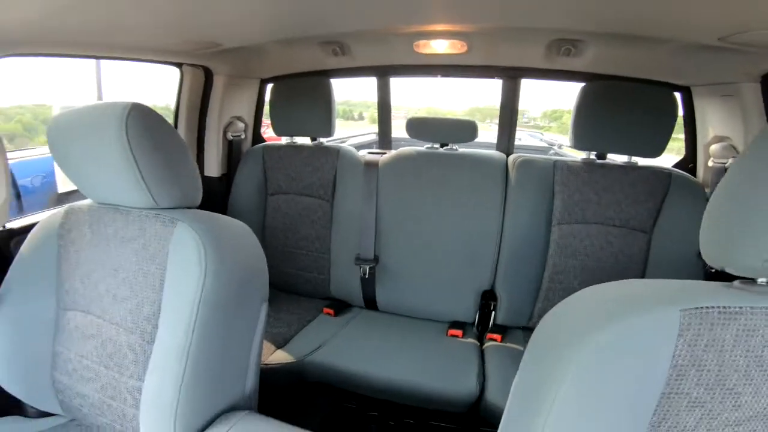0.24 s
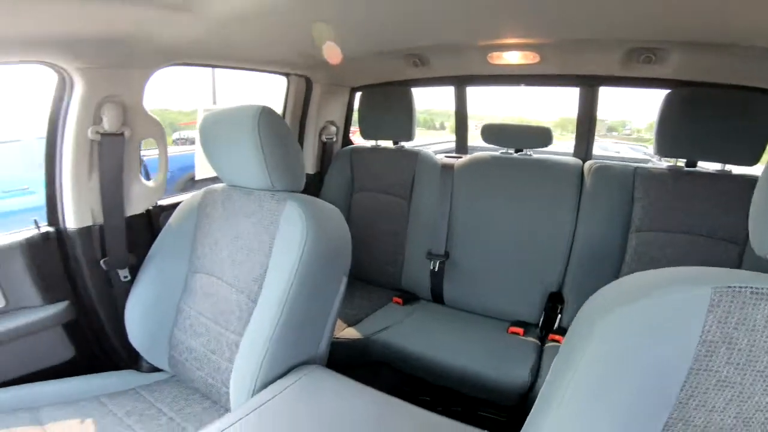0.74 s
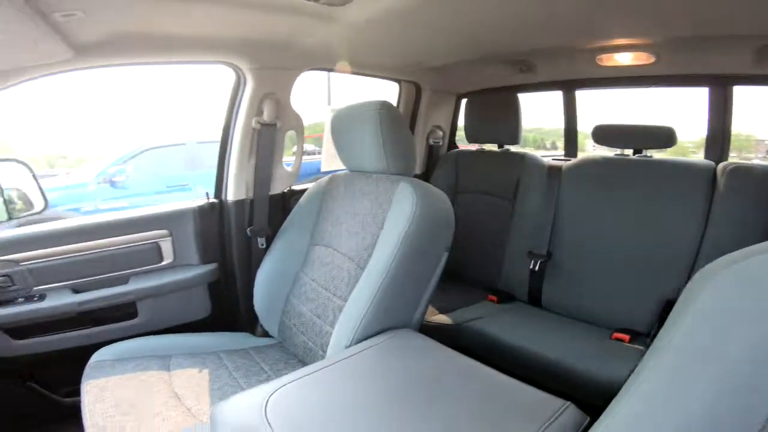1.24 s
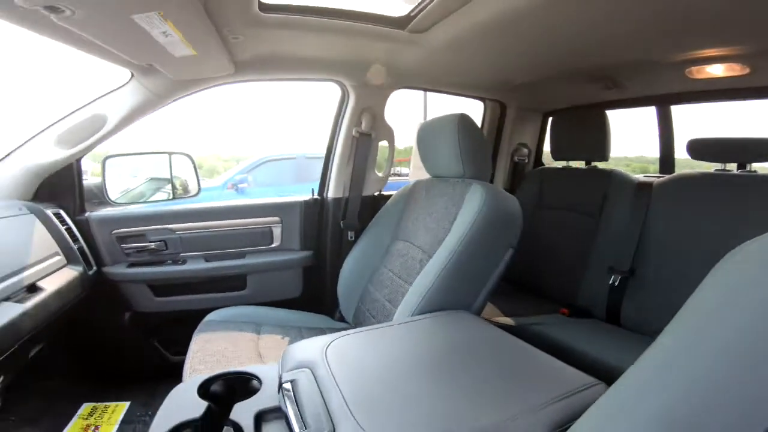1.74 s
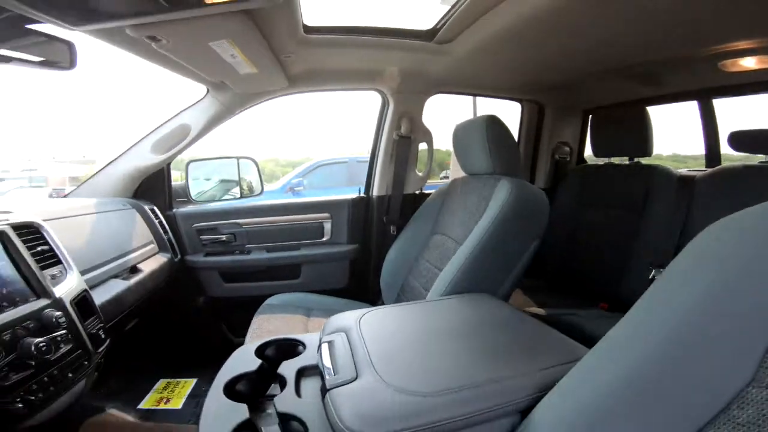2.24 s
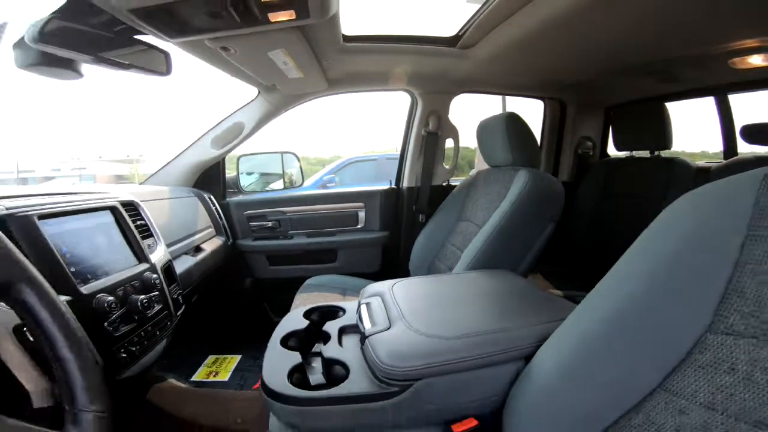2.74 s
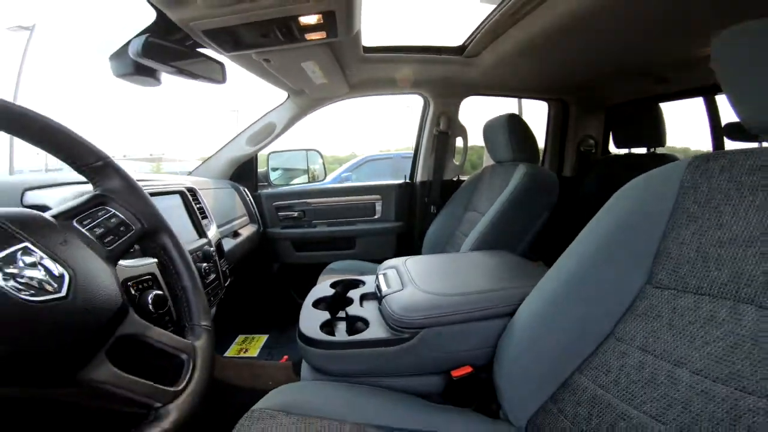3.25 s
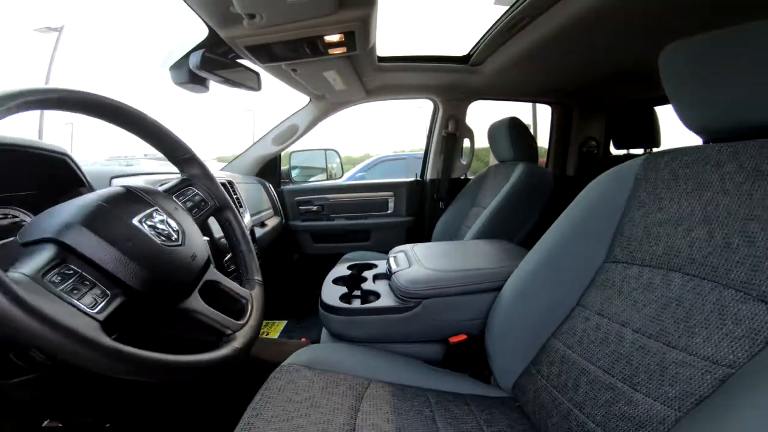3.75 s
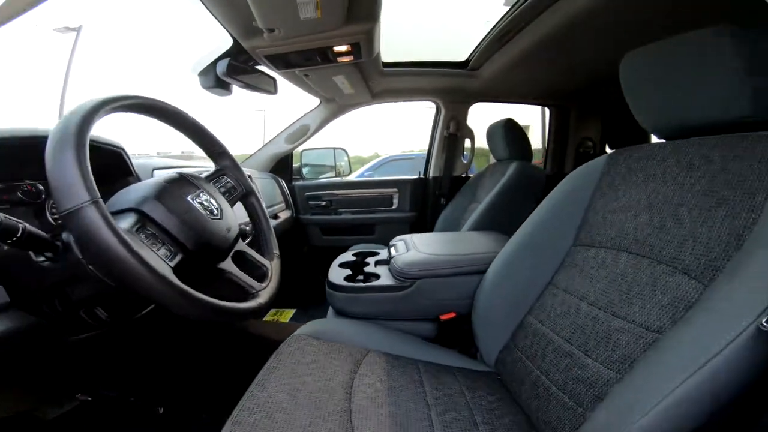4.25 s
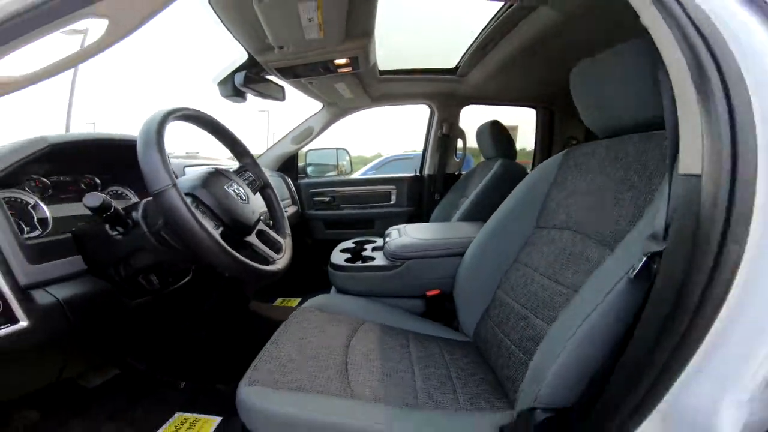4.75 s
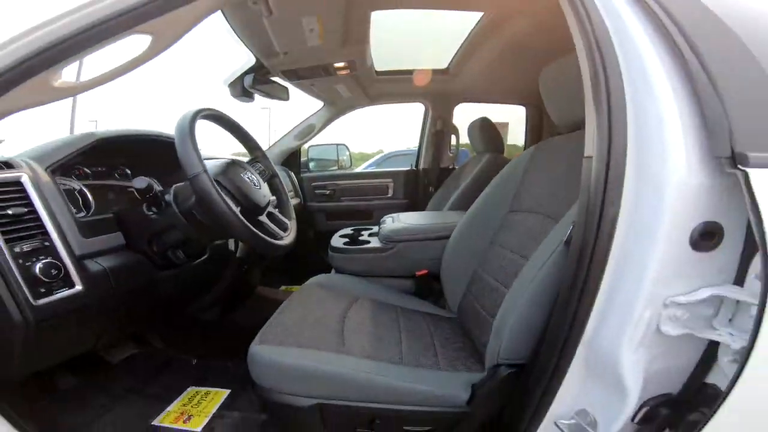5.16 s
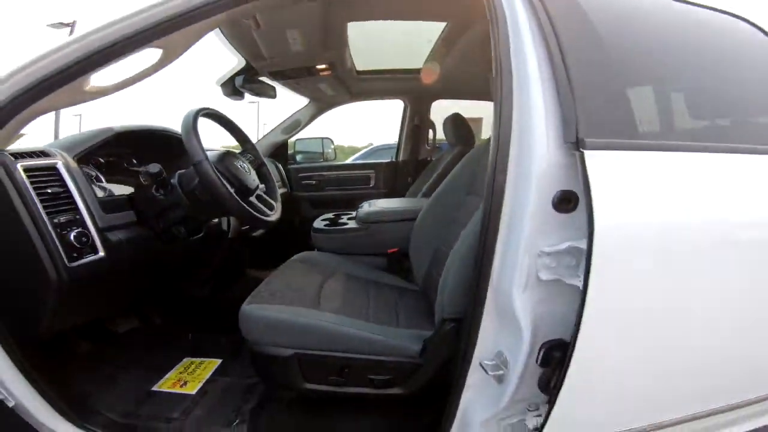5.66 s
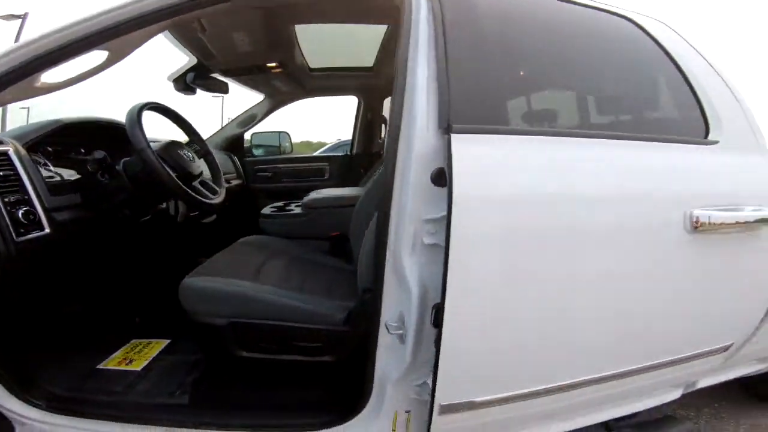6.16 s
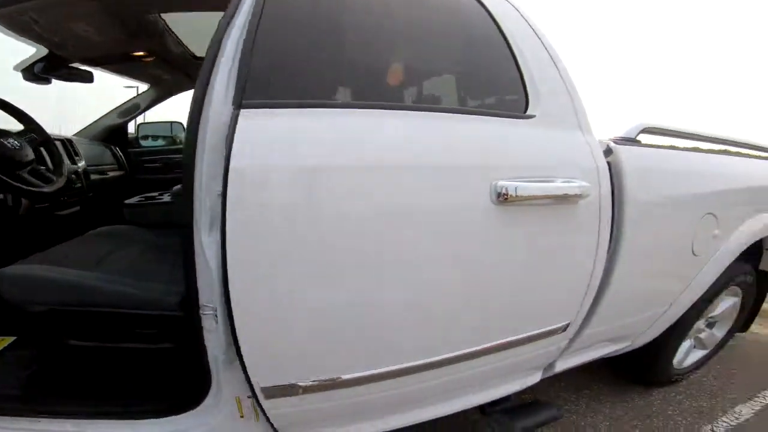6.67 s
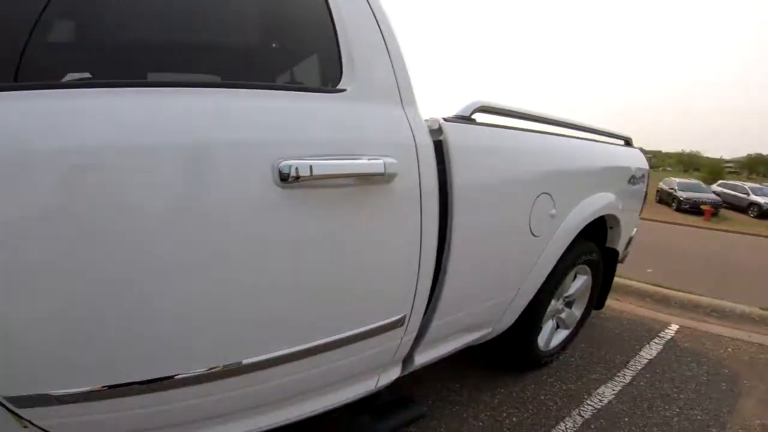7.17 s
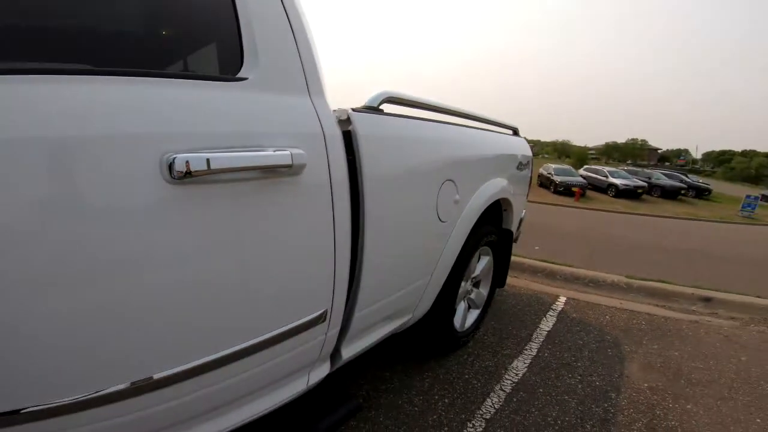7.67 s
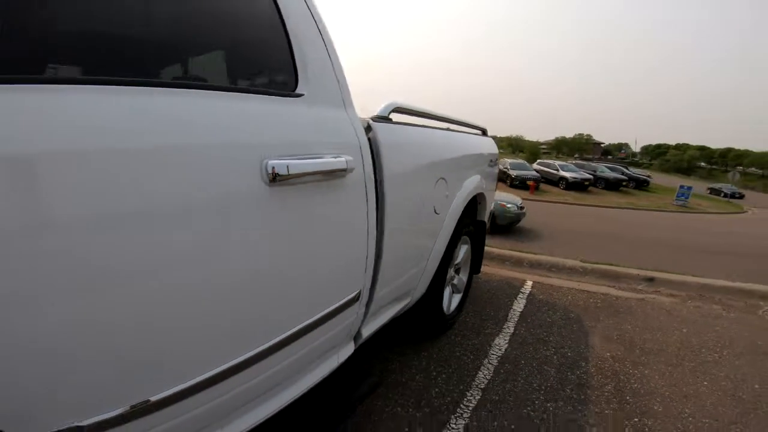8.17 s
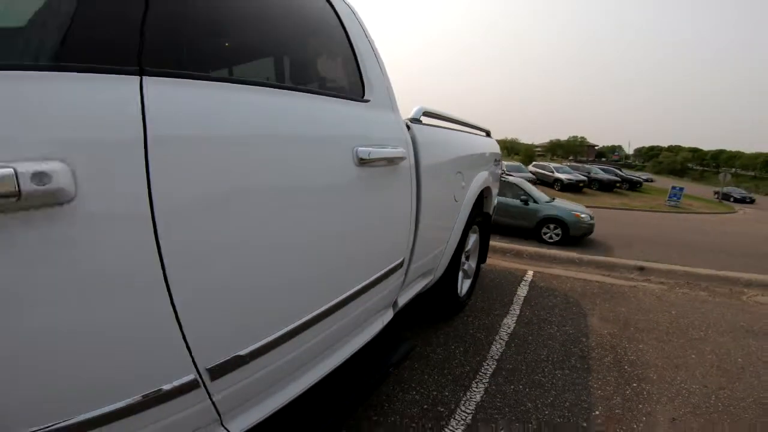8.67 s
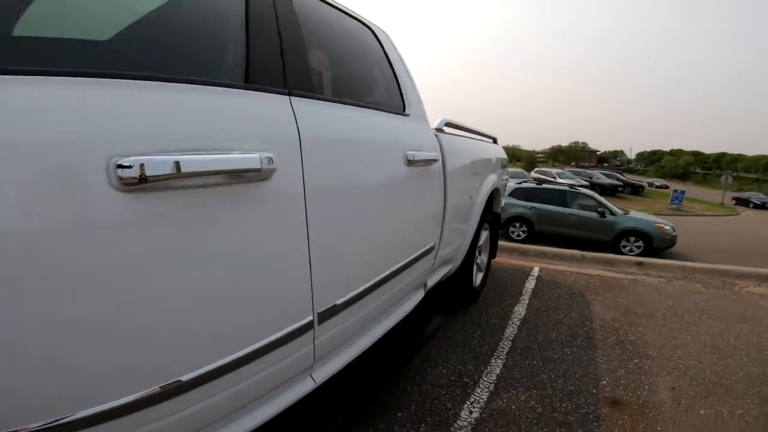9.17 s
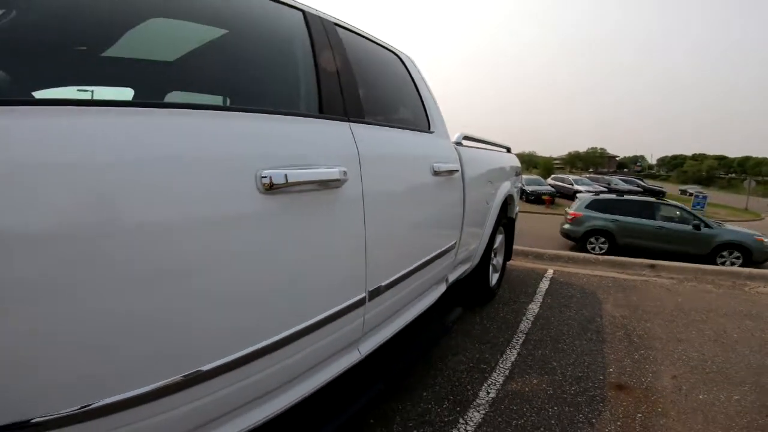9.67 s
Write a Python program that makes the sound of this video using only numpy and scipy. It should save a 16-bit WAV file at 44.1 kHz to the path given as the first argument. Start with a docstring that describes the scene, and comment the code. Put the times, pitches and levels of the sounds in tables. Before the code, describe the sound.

Low traffic rumble opens from a muffled cab to outdoors, a bird twitters, a truck door bangs shut, then a car hums by.

```python
"""Pickup door slam by a busy road

A microphone backs out of a parked pickup cab into a car park; the driver's door is slammed on ringing modes.
Tyres and traffic are banded noise, far engines, a passing car's hum and thin whistles are wandering sines.
A small bird chirps in slurred notes; an opening hiss, short foot scuffs and small ticks are filtered noise.
The recorder's gain control ducks after the slam and slowly climbs back."""
import sys
import numpy as np
from scipy import signal
from scipy.io import wavfile
from scipy.ndimage import uniform_filter1d

SR = 44100
rng = np.random.default_rng(int(sys.argv[2]) if len(sys.argv) > 2 else 0)


def master_out(mix):
    """Clip the mix to full scale and print it as 16-bit PCM to the path in sys.argv[1]."""
    frames = np.transpose(np.atleast_2d(mix))
    ceiling = np.clip(frames, -1, 1)
    pcm = np.round(ceiling * 32767).astype(np.int16)
    wavfile.write(sys.argv[1], SR, pcm)


N = 437913


def from_db(db):
    """Decibels to gain."""
    return np.exp(np.asarray(db) * (np.log(10) / 20))


def rms_one(x):
    """Scale to rms 1."""
    return x / np.sqrt(np.mean(x ** 2) + 1e-20)


def in_time(rows):
    """Columns of a curve at every sample; the first column is the time in seconds."""
    s, *columns = np.transpose(rows)
    return [np.interp(np.arange(N) / SR, s, column) for column in columns]


def at_hz(points, hz):
    """A spectrum read on a log-frequency axis."""
    point_hz, values = np.transpose(points)
    return np.interp(np.log(hz), np.log(point_hz), values)


def sides(db):
    """Left and right gains for a left-minus-right level."""
    return from_db(np.array([[db / 2], [-db / 2]]))


def add(out, s, sound):
    """Mix a short stereo sound in at a time in seconds."""
    i = round(s * SR)
    out[:, i:i + sound.shape[1]] += sound[:, :N - i]


def drift(rate_hz, size=N):
    """Slow chance of rms 1: noise at a fortieth of the sample rate through a double one-pole low-pass."""
    r = np.exp(-2 * np.pi * rate_hz * 40 / SR)
    noise = rng.standard_normal(N // 40 + 2002)
    slow = signal.lfilter([1], [1, -2 * r, r * r], noise)[2000:]     # skip the filter's start
    return np.interp(np.arange(size) / 40, np.arange(len(slow)), rms_one(slow))


def tone(hz, db, wander_hz, flutter_db):
    """A sine whose pitch wanders and whose level flutters."""
    phase = 2 * np.pi * (np.cumsum(hz + wander_hz * drift(8.01)) / SR + rng.random())
    return np.sqrt(2) * from_db(db + flutter_db * drift(19.0)) * np.sin(phase)


def faded_tone(rows, wander_hz):
    """A tone along a curve of pitch and level, faded over a tenth of a second at each end."""
    t = np.arange(N) / SR
    fade = np.clip(np.minimum(t - rows[0][0] + .05, rows[-1][0] - t + .1) / .1, 0, 1)
    return fade * tone(*in_time(rows), wander_hz, flutter_db=0.0)


# Stereo width of the noises. Each row: frequency in Hz, left-right likeness (1 is mono).
LIKENESS = [(60, 0.91), (130, 0.99), (260, 0.98), (540, 0.87), (1130, 0.084), (2360, 0.55), (4930, 0.24),
            (10300, 0.11)]


def banded_noise(spectra, outdoors, balance, patchy_db, size=N):
    """Third-octave bands of flickering stereo noise that blend two spectra; rms near 1."""
    first, last = spectra[1][0][0], min(spectra[1][-1][0], 13000)
    edges = np.geomspace(first, last, round(3 * np.log2(last / first)) + 1)
    white = rng.standard_normal((2, 2, size + 4000))
    together, out, power = drift(3.3, size), 0, 0
    for k, (low, high) in enumerate(zip(edges, edges[1:])):
        hz = np.sqrt(low * high)
        if at_hz(spectra[1], hz) < -60:     # too faint to hear
            continue
        band = signal.butter(2, [low, high], "band", fs=SR, output="sos")
        mid, side = signal.sosfilt(band, white[k % 2])[:, 4000:]     # neighbours get unrelated noise
        alike = at_hz(LIKENESS, hz)
        pair = np.sqrt(1 + alike) * mid + np.sqrt(1 - alike) * side * [[1], [-1]]
        gain = from_db((1 - outdoors) * at_hz(spectra[0], hz) + outdoors * at_hz(spectra[1], hz))
        power = power + gain ** 2 * (high - low) * 4 / SR
        flicker = from_db(patchy_db * (together + drift(10.3, size)))
        out = out + gain * flicker * pair * sides(at_hz(balance, hz))
    return out / np.sqrt(power)


# Traffic at the microphone. Each row: time in seconds, rumble, tyre roar and hiss levels in dB.
TRAFFIC = [(0, -31.5, -45.5, -57), (.5, -32, -46.5, -54.5), (.7, -29.5, -47.5, -58.5), (1, -31, -47, -59),
           (1.5, -30.5, -44.5, -58.5), (2.3, -30.5, -42, -58.5), (3.2, -28, -40.5, -56),
           (5.3, -26.5, -38, -52.5), (5.6, -27, -37.5, -50.5), (6.75, -26, -37, -50.5),
           (7.6, -28, -37.5, -49), (7.8, -23, -38, -49), (8.1, -26.5, -41.5, -53.5),
           (8.4, -27.5, -40, -52.5), (8.9, -27.5, -40, -50), (9.5, -27, -38.5, -48.5),
           (9.93, -24, -38, -46)]
# The way out of the cab. Each row: time in seconds, share outdoors from 0 to 1.
OUTDOORS = [(0, 0.01), (1.3, 0), (3, 0.61), (5.2, 0.88), (9.93, 0.99)]
# Colours of the three layers, each a pair: in the cab, outdoors.
# Each row: frequency in Hz, relative density in dB per Hz.
RUMBLE = ([(8.8, -34.5), (15, -3.5), (39, -1.5), (80, -14), (92, -7.5), (139, -11.5), (192, -10),
           (267, -27), (333, -20.5), (370, -29.5), (416, -28.5), (520, -48.5), (680, -79.5), (1140, -120)],
           [(8.8, -45.5), (15, -3.5), (43, -4), (69, -1), (80, -2.5), (137, -6), (207, -17), (292, -14.5),
           (338, -19), (404, -29.5), (520, -45), (680, -61), (1140, -120)])
ROAR = ([(220, -30), (380, -9.5), (450, -4), (707, -7.5), (799, 2.5), (1050, -10), (1150, -5.5), (1430, -6),
         (1570, -17.5), (2110, -12.5), (3600, -40.5), (4680, -59.5), (7920, -120)], [(220, -31), (380, -8),
         (425, -3), (495, -2), (845, 0), (920, 0.5), (1140, -0.5), (1320, -4), (3040, -14.5), (3600, -22),
         (4680, -53), (7920, -120)])
HISS = ([(1650, -24.5), (2800, -2.5), (3900, -7.5), (4460, -8.5), (5110, -11), (6730, -15.5), (7360, -14),
         (8560, -15), (10700, -32), (13900, -61.5), (22000, -120)], [(1650, -31), (2800, -2), (3810, -6),
         (4290, -2), (4670, -7.5), (7650, -13), (8560, -12), (10100, -19.5), (10700, -33), (13900, -55),
         (22000, -120)])
# Lean of the road in the stereo picture. Each row: frequency in Hz, left minus right in dB.
ROAD_SIDE = [(60, 2.5), (140, -1), (330, 0.5), (780, -4.5), (1850, -4.5), (4360, -2.5), (10300, -3.5)]
# Tyres of the car rolling past. Each row: time in seconds, level in dB.
CAR_LEVEL = [(7.9, -56), (8.6, -50.5), (9.3, -50.5), (9.93, -42.5)]
# Colour of those tyres. Each row: frequency in Hz, relative density in dB per Hz.
CAR_TYRES = [(900, -20), (1300, -6.5), (1700, 4.5), (2400, -6), (3400, -8.5), (5000, -25.5)]
TRAFFIC_TOP_HZ = 11500


def traffic():
    """Rumble, tyre roar, hiss and a car rolling by; the cab colours the first three until outdoors."""
    rumble_db, roar_db, hiss_db = in_time(TRAFFIC)
    outdoors = in_time(OUTDOORS)[0]
    rumble = from_db(rumble_db) * banded_noise(RUMBLE, outdoors, ROAD_SIDE, patchy_db=0.59)
    roar = from_db(roar_db) * banded_noise(ROAR, outdoors, ROAD_SIDE, patchy_db=0.55)
    hiss = from_db(hiss_db) * banded_noise(HISS, outdoors, ROAD_SIDE, patchy_db=1.0)
    car = from_db(in_time(CAR_LEVEL)[0]) * banded_noise((CAR_TYRES, CAR_TYRES), 0, ROAD_SIDE, patchy_db=0.9)
    sharp_top = signal.cheby2(12, 60, TRAFFIC_TOP_HZ, fs=SR, output="sos")
    return signal.sosfilt(sharp_top, rumble + roar + hiss + car)


# Notes of three far engines: one pitch in Hz for each.
ENGINES_HZ = [69.7, 77.4, 89.6]
# Their loudness. Each row: time in seconds, first, second and third engine levels in dB.
ENGINE_LEVELS = [(0, -40, -50, -60), (1.2, -37.5, -54, -47), (1.8, -33.5, -46, -35),
                 (2.5, -36.5, -34.5, -38), (3.6, -35, -36.5, -29), (4.6, -34.5, -33.5, -29),
                 (5.3, -30, -46.5, -26), (5.8, -34.5, -34.5, -32.5), (6.4, -31.5, -27.5, -31.5),
                 (7, -34.5, -38.5, -29.5), (7.8, -30.5, -42, -46), (8.5, -39.5, -32, -34),
                 (8.9, -32.5, -36.5, -41), (9.3, -51, -24.5, -43), (9.6, -30, -34.5, -46),
                 (9.93, -28, -34, -42)]


def far_engines():
    """Three low sines that waver in pitch and flutter in level around set notes."""
    return sum(tone(hz, db, wander_hz=2.184, flutter_db=3.5)
               for hz, db in zip(ENGINES_HZ, in_time(ENGINE_LEVELS)))


# A thin far whistle. Each row: time in seconds, pitch in Hz, level in dB.
WHISTLE = [(9.24, 6060, -64), (9.3, 5980, -64), (9.45, 6040, -62), (9.52, 6080, -67)]
# A brief lower whistle. Each row: time in seconds, pitch in Hz, level in dB.
LOW_WHISTLE = [(6.28, 3400, -62), (6.35, 3400, -58), (6.4, 3430, -60)]


def whistles():
    """Two faint high sines with a restless pitch."""
    return faded_tone(WHISTLE, wander_hz=30.0) + faded_tone(LOW_WHISTLE, wander_hz=25.0)


# Hum of the passing car. Each row: time in seconds, pitch in Hz, level in dB at the top of a throb.
HUM = [(8.15, 306, -43), (8.6, 302.4, -38), (9.05, 302, -35.5), (9.3, 297, -36), (9.75, 292, -39),
       (9.93, 286, -47)]
# A fainter, unthrobbed hum above it. Each row: time in seconds, pitch in Hz, level in dB.
UPPER_HUM = [(8.45, 322.4, -48), (8.85, 321, -46.5), (9.05, 323, -47), (9.35, 331.8, -45),
             (9.7, 317.6, -46)]
THROB_TOP_S, THROBS_PER_S, THROB_SLOWS_PER_S2 = 9.05, 4.81, 0.37     # the rate is that at THROB_TOP_S
THROB_DEPTH, THROB_SHARPNESS = 1, 1.7     # depth as a share, sharpness as a power


def passing_hum():
    """The car's hum swells and sinks in slowing throbs under a second, unthrobbed sine."""
    since = np.arange(N) / SR - THROB_TOP_S
    turns = THROBS_PER_S * since - THROB_SLOWS_PER_S2 / 2 * since ** 2
    swell = np.abs(np.cos(np.pi * turns)) ** THROB_SHARPNESS
    throb = 1 - THROB_DEPTH * (1 - swell)
    return throb * faded_tone(HUM, wander_hz=5.0) + faded_tone(UPPER_HUM, wander_hz=8.0)


# Bird notes. Each row: time in seconds (the note begins 5 ms sooner), level in dB, pitch in Hz before the slur.
CHIRPS = [(2.1869, -63, 4400), (2.2603, -53, 4320), (2.3316, -49.5, 4180), (2.4119, -49, 4400),
          (2.487, -48, 4380), (2.565, -48.5, 4330), (2.651, -47, 4310), (2.735, -47, 4350),
          (2.817, -50, 4420), (2.9118, -46.5, 4360), (5.432, -54.5, 4276), (5.5466, -55, 4580),
          (5.7, -56, 4480), (5.782, -52, 4280), (6.045, -54.5, 3900), (6.2063, -56, 4510),
          (6.3, -51.5, 4360), (6.465, -54, 4250), (6.583, -50.5, 4290), (6.65, -57, 4380),
          (6.735, -55, 4320), (6.816, -50.5, 4370), (6.899, -51, 4270), (6.982, -52, 4250),
          (7.064, -55, 4300), (7.152, -50.5, 4300), (7.249, -50.5, 4260), (7.336, -47, 4300),
          (7.437, -48.5, 4290), (7.539, -52, 4200), (7.6707, -54, 3900), (9.494, -51, 4530),
          (9.679, -49.5, 4330), (9.746, -50, 4340), (9.838, -51, 4220)]
# First and second song. Each row: note length in seconds, left minus right in dB,
# then pitch ratios at the start, shoulder, top and end.
SONGS = [(.034, -3, .935, .997, 1.01, .93), (.03, -6, .97, 1.002, 1.0, 0.78)]
SECOND_SONG_FROM_S = 4


def bird():
    """Each note slurs upward, warbles roughly and drops; parked cars send back smeared echoes."""
    out, warble, flutter = np.zeros((2, N)), drift(220), drift(160)
    wobbles = rng.normal(0, 1, (len(CHIRPS), 4))     # no two slurs alike
    for (s, db, hz), wobble in zip(CHIRPS, wobbles):
        length, pan_db, *slur = SONGS[int(s > SECOND_SONG_FROM_S)]
        u = np.linspace(0, 1, round(length * SR))
        now = slice(round(s * SR), round(s * SR) + len(u))
        ratios = np.array(slur) + .004 * wobble
        bend = np.interp(u, [0, .16, .74, 1], ratios) + .015 * warble[now]
        swell = np.sin(np.pi * u) ** .5 * rms_one(from_db(2.0 * flutter[now]))
        note = swell * np.sin(2 * np.pi * np.cumsum(hz * bend) / SR)
        add(out, s - .005, from_db(db) * note * sides(pan_db))
    decay = from_db(-60 * np.arange(4000) / SR / 0.16 - 31.5)     # falls 60 dB in 0.16 s
    echoes = rng.standard_normal((2, 4000)) * decay
    return out + signal.fftconvolve(out, echoes, axes=1)[:, :N]


# Band-limited noises: an opening hiss that swells and fades, then short scuffs. Each row: start in seconds,
# length in seconds, level in dB, low edge and high edge in Hz.
HISS_AND_SCUFFS = [(0., 0.72, -56, 1200, 2370), (0.82, 0.03, -54, 3200, 4200),
                   (2.772, 0.021, -51, 3900, 4700), (2.787, 0.02, -49, 3100, 5000),
                   (5.55, .08, -57, 2993, 4990), (6.22, 0.051, -59, 3500, 7000),
                   (9.802, .16, -49, 1200, 5000), (9.81, 0.05, -41.5, 6000, 9400),
                   (9.888, 0.047, -41.5, 4800, 9000), (9.783, .15, -51, 5000, 10500)]


def hiss_and_scuffs():
    """Band-limited noise with a lumpy level, each stretch rising and falling along an arch."""
    out = np.zeros((2, N))
    for s, length, db, low_hz, high_hz in HISS_AND_SCUFFS:
        band = signal.butter(2, [low_hz, high_hz], "band", fs=SR, output="sos")
        lumps = from_db(2.0 * drift(120, size=SR))
        noise = signal.sosfilt(band, lumps * rng.standard_normal((2, SR)))
        mid, side = noise[:, :round(length * SR)]
        arch = np.sin(np.linspace(0, np.pi, len(mid))) ** .6
        add(out, s, from_db(db) * arch * rms_one(mid + .5 * side * [[1], [-1]]))
    return out


# Small ticks and knocks. Each row: start in seconds, peak level in dB before stereo spread, centre in Hz,
# left minus right in dB, band width as a ratio either side.
TICKS = [(4.9651, -35, 2880, -6, 1.14), (4.9655, -43, 6000, -4, 1.2), (5.345, -41, 3050, -5, 1.15),
         (5.378, -39, 4500, -5, 1.4), (5.4136, -37, 2950, -7, 1.35), (5.445, -37, 2900, -6, 1.1),
         (5.468, -44, 5000, -5, 1.1), (5.587, -36, 3200, -4.5, 1.14), (5.66, -37, 2800, -5, 1.24),
         (5.79, -42, 2800, -5, 1.15), (5.848, -42, 3500, -5, 1.15), (9.003, -27, 597, -5.0, 1.6),
         (9.211, -31, 2000, 2, 2.4), (9.245, -28, 1176, 4, 1.8), (9.369, -34, 626, 13, 1.9),
         (9.809, -31, 1540, -1.5, 1.4), (9.8938, -23, 1360, -1.5, 1.2), (9.8942, -31, 6500, -1, 1.3)]
TICK_T60_S = 0.033


def ticks():
    """A click and a dying noise burst ring together in a narrow band."""
    out, t = np.zeros((2, N)), np.arange(2000) / SR
    for s, db, hz, pan_db, spread in TICKS:
        band = signal.butter(2, [hz / spread, hz * spread], "band", fs=SR, output="sos")
        click = 5.2 * (t == 0) * [[1], [0]]     # in the middle only
        burst = (rng.standard_normal((2, 2000)) + click) * from_db(-60 * t / TICK_T60_S)
        mid, side = signal.sosfilt(band, burst)
        pair = (mid + 0.88 * side * [[1], [-1]]) / np.abs(mid).max()
        add(out, s, from_db(db) * pair * sides(pan_db))
    return out


# Contacts of the closing door. Each row: time in seconds, polarity of the blow (+1 or -1), panel blow, cab push
# and crack drives in dB, crack brightness in Hz, latch strike drive in dB, latch pitch in Hz.
SLAM = [(7.8890, 1, -27, -32, -14, 2600, -8.5, 1940), (7.893, -1, -16, -28, -16, 6000, -13, 3600),
        (7.897, -1, -13, -26, -25, 6000, -25, 3600), (7.901, 1, -32, -28, -19.5, 11000, -13, 1600),
        (7.9030, 1, -17, -10.5, -21, 14000, -13, 1300), (7.9068, 1, -27, -28, -17, 13000, -10, 4800),
        (7.9080, 1, -11, -21, -23, 9000, -16, 3200), (7.91, -1, -13.5, -6, -26, 7000, -17, 2510),
        (7.9170, 1, -23, -19, -30, 5000, -22, 1200), (7.922, -1, -28, -30, -26, 7000, -29, 2200),
        (7.927, -1, -32, -24, -22, 11000, -25, 3300), (7.931, -1, -31, -17, -25, 9000, -23, 3400),
        (7.9336, 1, -10, -14, -27, 8000, -20, 3400), (7.9370, 1, -13.5, -19, -29, 8000, -23, 3000),
        (7.9404, -1, -24, -22, -30, 10000, -16, 3000), (7.9440, -1, -32, -12, -31, 7000, -15, 5330),
        (7.948, 1, -31, -33, -36, 7000, -32, 3200), (7.956, -1, -25, -16, -28, 1300, -38, 1200),
        (7.9640, 1, -22, -21, -33, 1300, -36, 1200), (7.972, 1, -20, -17, -29, 1200, -37, 1200),
        (7.984, -1, -24, -25, -37, 1300, -30, 1150), (7.992, 1, -22, -31, -33, 800, -45, 1200),
        (8.008, -1, -22, -24, -40, 900, -45, 1200), (8.017, 1, -29, -26, -42, 600, -45, 1200)]
# Cab, panel and latch modes, low to high. Each row: frequency in Hz, relative level in dB, T60 in seconds.
DOOR_MODES = [(42, 0, 0.23), (68.5, -2.5, 0.092), (146, -3, 0.063), (206, -7, 0.05), (269, 3.5, 0.032),
              (341, -4.5, 0.045), (467, -13.5, 0.093), (630, -17, 0.034), (780, -16, 0.031),
              (1170, -5.5, 0.07), (1670, -9, 0.024), (2060, -7.5, 0.022), (2610, -10.5, 0.028),
              (3000, -17.5, 0.018), (3540, -16, 0.036), (3900, -21, 0.03), (4360, -14, 0.021),
              (5410, -15, 0.016), (5740, -21, 0.045)]
# Colour of the cracks. Each row: frequency in Hz, relative density in dB per Hz.
CRACK = [(180, -22), (320, 4), (550, 4.5), (800, 2), (1150, 2), (1500, -3), (2100, -5), (2900, -4),
         (4400, -10), (5500, -12), (8400, -11.5), (10500, -16), (13000, -12)]
# Lean of the door in the stereo picture. Each row: frequency in Hz, left minus right in dB.
DOOR_SIDE = [(60, 2), (170, -0.5), (470, 2), (1310, 8.5), (3670, 5.5), (10300, 0)]
CAB_MODES_UNDER_HZ, LATCH_MODES_OVER_HZ = 170, 1000
# once the door sits in its seal the cracks die slower
CRACK_T60_S, SETTLING_FROM_S, SETTLING_T60_S = 0.031, 7.946, 0.13
BLOW_SOFTNESS = 0.39     # cutoff of panel and cab blows as a share of the crack's brightness


def door_slam():
    """Each contact of the door rings cab, panel and latch modes and cracks in dying noise."""
    size, start, out = SR // 2, SLAM[0][0], np.zeros((2, N))
    t = np.arange(size) / SR
    noise = banded_noise((CRACK, CRACK), 0, DOOR_SIDE, patchy_db=1.5, size=size)
    blows = np.zeros((3, size))     # drives of the cab, the panel and the latch
    for s, polarity, blow_db, push_db, crack_db, bright_hz, latch_db, latch_hz in SLAM:
        click = polarity * (np.arange(size) == round((s - start) * SR))
        soft = signal.butter(2, BLOW_SOFTNESS * bright_hz, fs=SR, output="sos")
        blows[:2] += signal.sosfilt(soft, from_db([[push_db], [blow_db]]) * click)
        # each strike favours its own part of the latch
        latch_band = signal.butter(2, [latch_hz / 1.32, latch_hz * 1.36], "band", fs=SR)
        blows[2] += signal.lfilter(*latch_band, from_db(latch_db) * click)

        t60 = SETTLING_T60_S if s > SETTLING_FROM_S else CRACK_T60_S
        since = np.maximum(t - (s - start), 0)
        burst = from_db(crack_db - 60 * since / t60) * np.minimum(since / 0.0018, 1)
        padding = signal.butter(4, bright_hz, fs=SR, output="sos")     # duller when padded
        add(out, start, signal.sosfilt(padding, burst * noise))
    for k, (hz, db, t60) in enumerate(DOOR_MODES):
        is_latch = hz > LATCH_MODES_OVER_HZ
        drive = blows[int(hz > CAB_MODES_UNDER_HZ) + int(is_latch)]
        sense = (-1) ** (k * is_latch)     # neighbouring latch modes swing in opposite senses
        r, w = from_db(-60 / (t60 * SR)), 2 * np.pi * hz / SR
        ring = signal.lfilter([0, sense * np.sin(w)], [1, -2 * r * np.cos(w), r * r], drive)
        add(out, start, from_db(db) * ring * sides(at_hz(DOOR_SIDE, hz)))
    return out


def scene():
    """Everything around the cab, from the far road to the slam."""
    background = traffic() + far_engines() + whistles() + passing_hum()
    return background + bird() + hiss_and_scuffs() + ticks() + door_slam()


DUCK_ABOVE_DB, DUCK_SHARE = -19, 0.54     # share of the excess in dB that is taken away
RECOVER_DB_S, DUCK_S = 6.5, 0.21     # recovery in dB per second, smoothing time constant in seconds
TOP_SOFTENS_HZ, CUTOFF_HZ = 10500, 14300


def record(dry):
    """Gain control ducks on loud sound and recovers at a steady rate; peaks are rounded, the top is cut."""
    # the highest treble is softened
    dry = signal.sosfilt(signal.butter(4, TOP_SOFTENS_HZ, fs=SR, output="sos"), dry)
    power = uniform_filter1d(np.mean(dry ** 2, axis=0), size=882)     # over 20 ms
    level_db = 10 * np.log10(power + 1e-12)
    over_db = np.maximum(level_db - DUCK_ABOVE_DB, 0) * DUCK_SHARE
    # hold the deepest cut so far, less what has been recovered since
    climb = RECOVER_DB_S * np.arange(N) / SR
    held_db = np.maximum(np.maximum.accumulate(over_db + climb) - climb, 0)
    r = np.exp(-1 / (DUCK_S * SR))
    ducked = dry * from_db(-signal.lfilter([1 - r], [1, -r], held_db))
    rounded = 0.91 * np.tanh(ducked / 0.96)
    return signal.sosfilt(signal.cheby2(12, 70, CUTOFF_HZ, fs=SR, output="sos"), rounded)


dry = scene()
out = record(dry)
master_out(out)
```